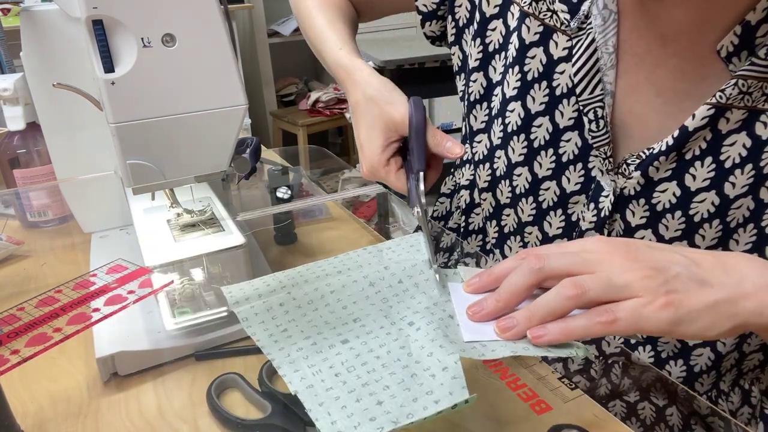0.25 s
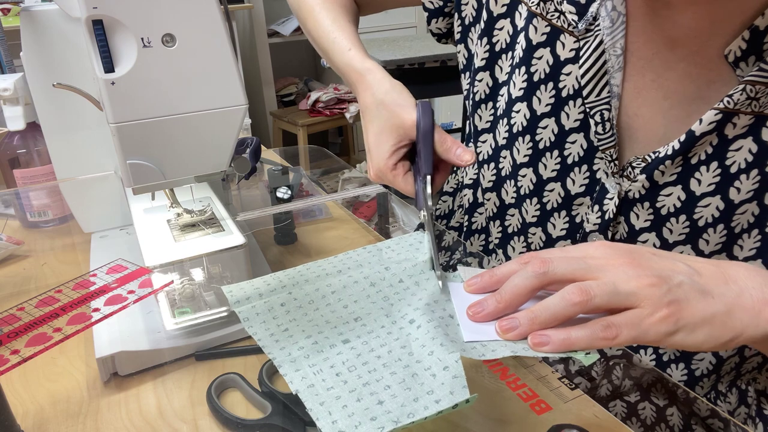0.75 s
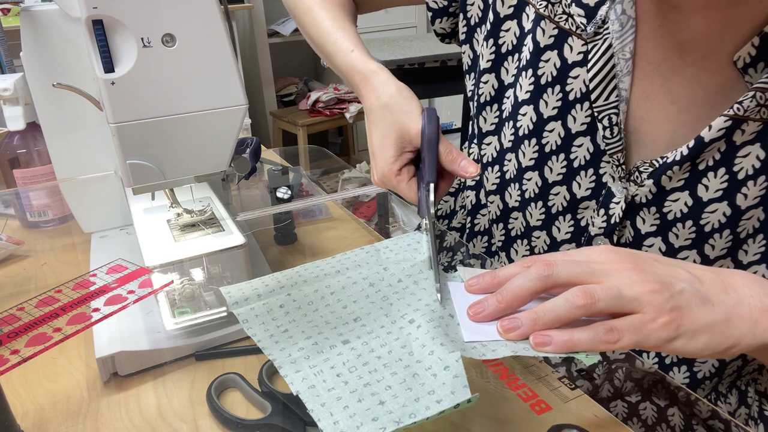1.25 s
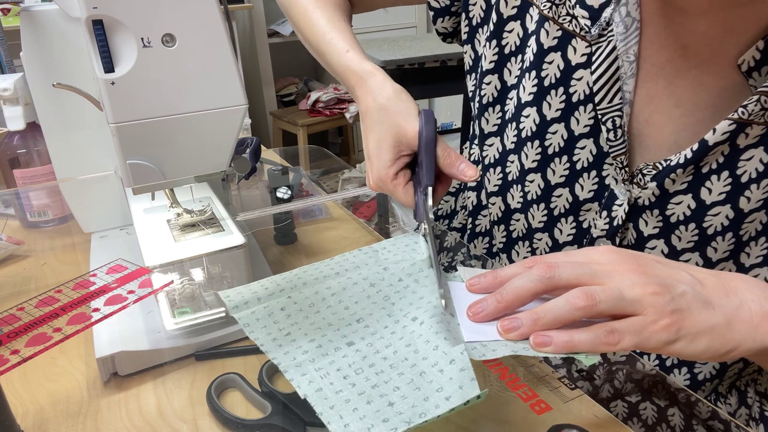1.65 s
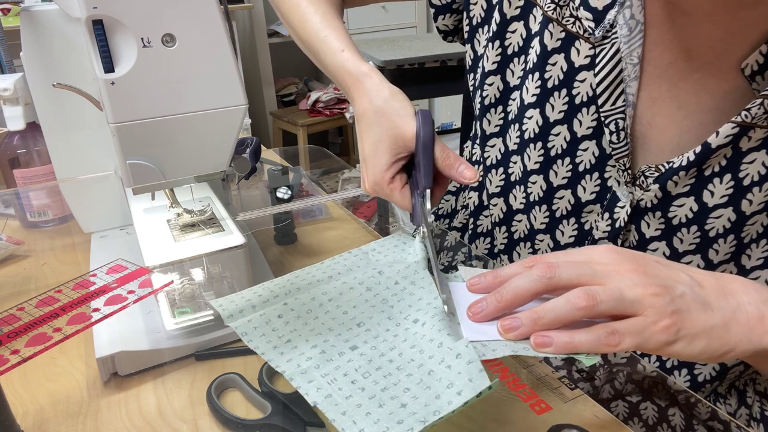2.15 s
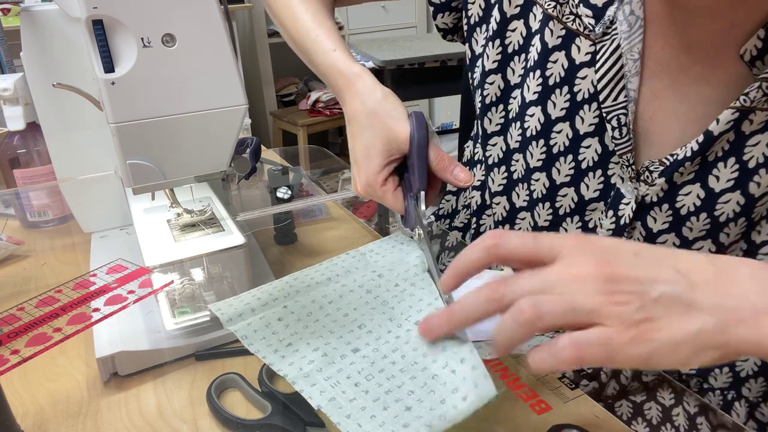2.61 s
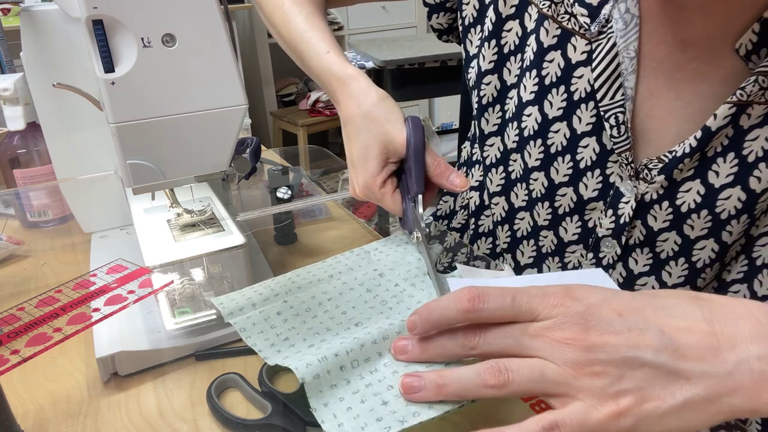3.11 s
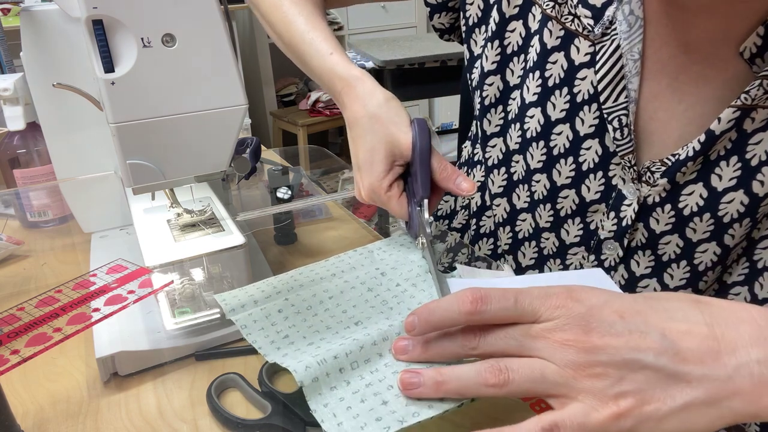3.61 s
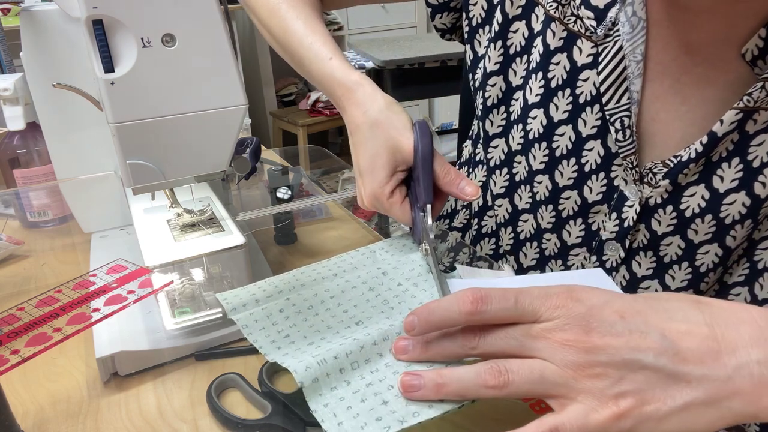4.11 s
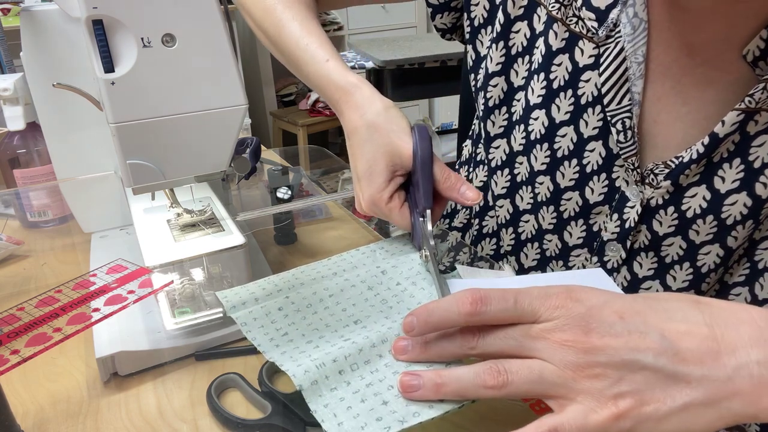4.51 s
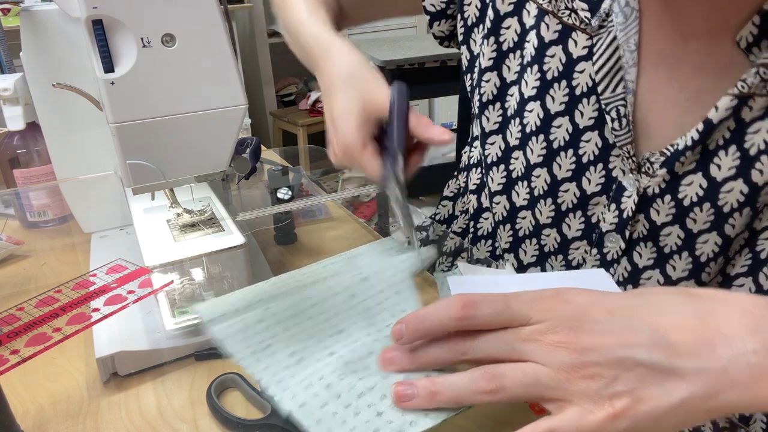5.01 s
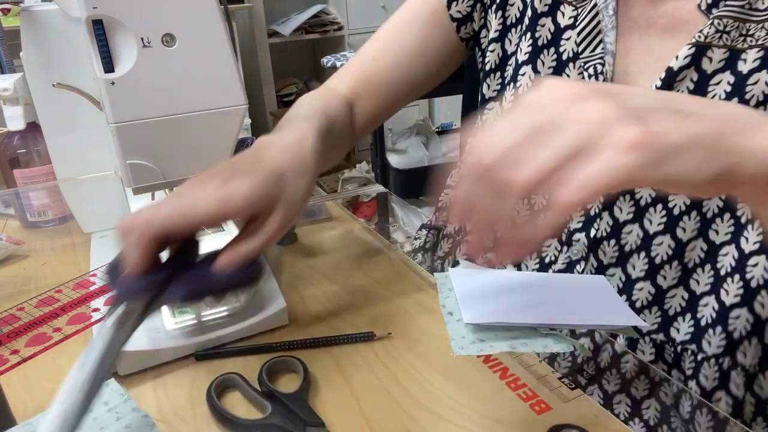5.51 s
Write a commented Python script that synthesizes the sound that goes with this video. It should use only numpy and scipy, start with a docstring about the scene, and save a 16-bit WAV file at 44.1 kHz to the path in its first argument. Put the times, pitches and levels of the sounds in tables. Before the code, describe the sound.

In a small quiet room, dressmaking scissors cut cotton close to a stereo microphone. Three gritty, metallic snips come at an easy pace, the blades rubbing softly open between them. Cloth rustles during a pause, then five shorter snips quicken, with handles knocking near the end. The cloth slides away and the scissors land on wood with a loud clack.

```python
"""Dressmaking scissors cut cotton on a wooden table in a small, quiet room: three snips, a pause, five quicker ones.
Each snip is a dense run of noise bursts, one per snapping thread, ringing through blade and table filters.
Rough filtered noise makes the blades rub as they reopen and the cloth slide; gliding sines groan softly between.
Blurred decaying modes knock the handles together after some snips and set the scissors down with a clack.
A steady hush lies under it all."""
import sys
import numpy as np
from scipy import signal
from scipy.fft import rfft, irfft, next_fast_len
from scipy.io import wavfile
from scipy.ndimage import map_coordinates

SR = 44100
rng = np.random.default_rng(int(sys.argv[2]) if len(sys.argv) > 2 else 0)


def materialize(psi):
    """Save the field psi as 16-bit PCM at rate SR to the path in sys.argv[1].

    A 1-D psi becomes a single channel; in a 2-D psi each row is a channel.
    """
    bounded = np.clip(np.atleast_2d(psi).T, -1, 1)
    quanta = np.round(bounded * 32767).astype(np.int16)
    wavfile.write(sys.argv[1], SR, quanta)


N = 253610


def amp(db):
    """Decibels to gain."""
    return 10 ** (np.asarray(db) / 20)


def unit(x):
    """Scale to rms 1."""
    return x / np.sqrt(np.mean(x ** 2) + 1e-20)


def along(points, hz):
    """Read (f/Hz, value) points on a log frequency axis."""
    f, v = np.transpose(points)
    return np.interp(np.log(hz + 1), np.log(f + 1), v)


def clock():
    """The time of every sample, in seconds."""
    return np.arange(N) / SR


def wobble(rate):
    """A smooth random curve through rate knots a second."""
    knots = rng.standard_normal(int(N * rate / SR) + 4)
    return map_coordinates(knots, [np.arange(N) * rate / SR])


def colour(x, spectrum, peaks=(), size=8192):
    """Causal minimum-phase filter of energy 1: a broad spectrum with resonances standing on it."""
    hz = np.fft.rfftfreq(size, 1 / SR)
    db = along(spectrum, hz)
    for centre, width, rise in peaks:
        db = db + rise / (1 + (2 * (hz - centre) / width) ** 2)
    cepstrum = irfft(np.log(amp(db)))
    kernel = irfft(np.exp(rfft(2 * cepstrum[:size // 2], size)))
    return signal.oaconvolve(x, kernel / np.linalg.norm(kernel))[:len(x)]


def stroke(t, start, end, edge):
    """A gate from start to end whose flanks last edge seconds."""
    rise = np.clip((t - start) / edge + .5, 0, 1)
    fall = np.clip((end - t) / edge + .5, 0, 1)
    return rise * fall


def add(track, s, sound):
    """Mix a sound in at time s."""
    part = track[round(s * SR):][:len(sound)]
    part += sound[:len(part)]


def burst(t60, size=16384):
    """Noise of energy 1 that falls 60 dB in t60 seconds."""
    x = rng.standard_normal(size) * amp(-60 * np.arange(size) / SR / t60)
    return x / np.linalg.norm(x)


def friction(rows, spectrum, edge, rough_db, rough_rate):
    """Uneven rubbing: noise of randomly wavering strength under a series of strokes."""
    t = clock()
    pressure = sum(amp(db) * stroke(t, start, end, edge) for start, end, db in rows)
    rough = unit(amp(rough_db * wobble(rough_rate)) * rng.standard_normal(N))
    return colour(pressure * rough, spectrum)


# the hush of the quiet room: (f/Hz, relative level/dB)
HUSH_SPECTRUM = [(15, -60), (25, -14), (64, -2.5), (113, -2), (144, -3), (246, -7), (322, -10),
                 (389, -11.5), (684, -12.5), (782, -12.5), (2060, -19), (2490, -18), (3000, -19),
                 (15500, -26.5)]


def air():
    """The steady hush: noise common to both sides, plus a weaker independent noise on each."""
    mid, left, right = (colour(rng.standard_normal(N), HUSH_SPECTRUM) for _ in range(3))
    return amp(-68.5) * mid + amp(-75.5) * np.array([left, right])


# how long the reverberation lasts: (f/Hz, t60/s)
ROOM_DECAY = [(100, 0.6), (500, 0.23), (2000, 0.31), (6000, 0.22), (8500, 0.15), (14000, 0.27)]


def room(x):
    """The walls answer after 4 ms; each frequency dies at its own speed."""
    hz, t, z = signal.stft(rng.standard_normal(SR // 2), SR, nperseg=256)
    decay = np.exp(-np.log(1000) * t / along(ROOM_DECAY, hz)[:, None])
    tail = signal.istft(z * decay, SR, nperseg=256)[1]
    return signal.fftconvolve(np.pad(x, (SR // 250, 0)), tail / np.linalg.norm(tail))[:N]


# level difference between the two listening points: (f/Hz, left minus right level/dB)
LEFT_RIGHT_DB = [(60, 0), (150, -0.5), (380, -5.5), (950, -2.0), (2380, -2), (5980, -1.5), (15000, 0)]
# phase difference between them: (f/Hz, phase by which left leads/rad)
LEFT_LEAD = [(0, 0.52), (5600, 0.32), (8610, 0.41), (9040, 0.11), (9820, 0.99), (10800, 0.059),
             (16200, 0.0)]


def place(x, wet_db, wide_db):
    """A source in the room heard at two close points: small level and phase offsets, faint side echoes."""
    mid, side = x + amp(wet_db) * room(x), amp(wide_db) * room(x)
    m = next_fast_len(N + SR // 2)
    hz = np.fft.rfftfreq(m, 1 / SR)
    half = amp(along(LEFT_RIGHT_DB, hz) / 2) * np.exp(.5j * along(LEFT_LEAD, hz))
    return irfft(rfft([mid + side, mid - side], m) * [half, 1 / half], m)[:, :N]


# faint low groans between strokes: (start t/s, end t/s, first f/Hz, last f/Hz, mid-glide level/dB)
GROAN_GLIDES = [(0.729, 0.872, 158, 139, -62), (1.808, 2.033, 122.5, 180, -62),
                (2.234, 2.559, 147.5, 56, -67), (3.19, 3.334, 125.3, 104, -62),
                (3.726, 3.993, 206.3, 174, -65.5), (4.879, 5.1, 104.8, 50, -62)]
GROAN_DB_PER_OCTAVE = 9  # a groan weakens as it sinks


def groans():
    """Soft low sines that glide in pitch and waver in pitch and level."""
    t, out = clock(), np.zeros(N)
    waver = 1 + 0.0735 * wobble(55)
    for start, end, first_hz, last_hz, db in GROAN_GLIDES:
        octaves = np.interp(t, [start, end], [-.5, .5]) * np.log2(last_hz / first_hz)
        pitch = np.sqrt(first_hz * last_hz) * 2 ** octaves * waver
        level = amp(db + GROAN_DB_PER_OCTAVE * octaves) * stroke(t, start, end, edge=0.061)
        out += level * np.sin(2 * np.pi * np.cumsum(pitch) / SR)
    return out * amp(0.63 * wobble(30))


# cloth slides under the hand: (start t/s, end t/s, hiss level/dB, dull table drag level/dB)
CLOTH_SLIDES = [(0.107, 0.344, -88, -69), (2.212, 2.31, -75, -64), (2.358, 2.445, -69, -68.5),
                (2.45, 2.572, -67.5, -83), (2.74, 2.814, -70.5, -82), (5.005, 5.234, -75.5, -86)]
# hiss of the sliding cloth: (f/Hz, relative level/dB)
CLOTH_SPECTRUM = [(200, -4), (1000, -12.5), (2500, -15), (5500, -2.5), (9000, -6.5), (15000, -10)]
# dull rubbing, of cloth on table and of reopening blades: (f/Hz, relative level/dB)
RUB_SPECTRUM = [(60, -23), (130, 5), (300, -9), (520, 5), (680, -3.5), (900, 1), (1200, -4.5),
                (1600, -10.5), (3500, -15.5), (4500, -21.5), (7500, -23), (10000, -34), (16000, -38)]


def cloth():
    """Sliding cloth hisses and drags dully on the table."""
    hiss_rows = [(start, end, db) for start, end, db, _ in CLOTH_SLIDES]
    drag_rows = [(start, end, db) for start, end, _, db in CLOTH_SLIDES]
    hiss = friction(hiss_rows, CLOTH_SPECTRUM, edge=0.043, rough_db=4.0, rough_rate=90)
    drag = friction(drag_rows, RUB_SPECTRUM, edge=0.02, rough_db=2.5, rough_rate=150)
    return hiss + drag


# push of a blunt contact: (f/Hz, relative level/dB)
BLOW_SPECTRUM = [(30, -42), (120, -22), (400, 13), (1400, 2), (2200, -3), (3700, -10), (5500, -31),
                 (16000, -41)]


def strike(modes, blow_db, scatter_db, blur, lowest_hz):
    """A blunt push, then modes blurred by the loose contact; small bodies radiate no bass."""
    t = np.arange(SR // 2) / SR
    ring = amp(blow_db) * colour(signal.unit_impulse(len(t)), BLOW_SPECTRUM)
    for hz, db, t60 in modes:
        drift = blur * np.cumsum(rng.standard_normal(len(t))) / np.sqrt(t60 * SR)
        decay = np.exp(-np.log(1000) * t / t60)
        ring += amp(db + scatter_db * rng.normal()) * decay * np.sin(2 * np.pi * hz * t + drift)
    return signal.sosfilt(signal.butter(2, lowest_hz, "high", fs=SR, output="sos"), ring)


# modes of the tabletop: (f/Hz, mean relative level/dB, t60/s)
TABLETOP_MODES = [(52.5, -22, 0.56), (86, -20, 0.62), (109, -15, 0.33), (140, -32, .25), (180, -18.5, 0.23),
                  (245, -13.5, 0.56), (280, -7, 0.12), (352, -15, 0.28), (485, -13, 0.22), (710, -20, 0.09),
                  (776, -12, 0.12), (910, -20, .15), (996, -21, 0.14), (1410, -4.5, 0.023),
                  (1920, -15, 0.034), (3570, -38, 0.11), (4370, -35, .07), (5600, -26, .15),
                  (5850, -32, 0.14)]
# blade on blade: (f/Hz, relative level/dB)
CLINK_SPECTRUM = [(500, -17), (3000, -17), (4500, -1.5), (5700, 1.5), (7300, -9.5), (9000, -16),
                  (12000, -11.5), (16000, -30)]
# loose things on the table: (f/Hz, relative level/dB)
CLATTER_SPECTRUM = [(200, -7), (450, -9), (720, 10.5), (1000, -5), (1500, -11), (2200, -11), (3000, -24),
                    (6000, -27), (12000, -45)]
# the whole table shudders: (f/Hz, relative level/dB)
THUD_SPECTRUM = [(30, -35), (55, -6), (110, 6), (160, -4.5), (260, -7.5), (450, -16), (1000, -30),
                 (3000, -55)]


def set_down():
    """The handles land on the tabletop, the blades clink together, then the weight of the hand settles."""
    out = np.zeros(N)
    tabletop = strike(TABLETOP_MODES, blow_db=14, scatter_db=1.0, blur=2.8, lowest_hz=50)
    add(out, 5.6754, -amp(-22.0) * tabletop)
    add(out, 5.676, amp(-4.5) * colour(burst(t60=0.013), BLOW_SPECTRUM))
    add(out, 5.678, amp(-7.5) * colour(burst(t60=0.16), CLATTER_SPECTRUM))
    add(out, 5.6783, amp(-9.0) * colour(burst(t60=0.0096), CLINK_SPECTRUM))
    add(out, 5.6825, amp(-34) * colour(burst(t60=0.026), CLINK_SPECTRUM))
    add(out, 5.684, amp(-3.5) * colour(burst(t60=0.32), THUD_SPECTRUM))
    add(out, 5.740, amp(-12) * colour(burst(t60=0.036), THUD_SPECTRUM))  # the hand settles
    return out


# light touches of the blades: (t/s, relative level/dB)
BLADE_TICKS = [(0.302, -48.5), (.322, -49), (2.483, -50), (2.698, -45.5), (3.279, -54), (5.434, -47.5)]
# tone of a light touch: (f/Hz, relative level/dB)
TICK_SPECTRUM = [(300, -20), (1500, 4), (3000, -4.5), (5500, 1), (7500, -7), (15000, -8)]
# the handles meet: (t/s, relative level/dB)
HANDLE_KNOCKS = [(1.236, -35), (3.609, -26), (4.469, -16.5), (4.7354, -12)]
# modes of the plastic handles: (f/Hz, mean relative level/dB, t60/s)
HANDLE_MODES = [(539, -6, 0.074), (645, -15, 0.082), (887, -10, 0.06), (1063, -3, 0.021), (1287, -13, .04),
                (1462, -19, 0.056), (1940, -37, 0.027)]


def contacts():
    """The blades tick; the plastic handles knock together and jolt the table."""
    out = np.zeros(N)
    for s, db in BLADE_TICKS:
        add(out, s, amp(db + 8.5) * colour(burst(t60=0.014), TICK_SPECTRUM))
    for s, db in HANDLE_KNOCKS:
        knock = strike(HANDLE_MODES, blow_db=-16, scatter_db=2.0, blur=2.4, lowest_hz=473)
        add(out, s, amp(db - 9.5) * knock)
        add(out, s + 0.01714, amp(db - 1.5) * colour(burst(t60=0.117), THUD_SPECTRUM))
    return out


USUAL_CUT_S = 0.067  # a stroke of middling speed
TURN_S, TURN_SHARE = .083, .45  # the hand turns round after a fixed pause plus a share of the cut's length
RUB_DB, RUB_DB_PER_DOUBLING = -59, 4  # a quicker reopening rubs louder
WHISPER_DB, WHISPER_STRETCH = -74.5, 1.73  # the bare edges whisper on, this many times as long as the rub


def reopenings():
    """After a cut the hand turns round: the blades rub open and their bare edges whisper over each other."""
    rubs, whispers = [], []
    for start, end, _, _, _, _, _, length, *_ in SNIP_STROKES:
        if length > .01:
            turn = end + TURN_S + TURN_SHARE * (end - start)
            rub_db = RUB_DB + RUB_DB_PER_DOUBLING * np.log2(USUAL_CUT_S / length)
            rubs.append((turn, turn + length, rub_db))
            whispers.append((turn, turn + WHISPER_STRETCH * length, WHISPER_DB))
    rub = friction(rubs, RUB_SPECTRUM, edge=0.038, rough_db=2.5, rough_rate=150)
    whisper = friction(whispers, EDGE_SPECTRUM, edge=0.1, rough_db=4.0, rough_rate=52)
    return rub + whisper


def threads(t, rate, life, spread_db, scrape):
    """Threads part at uneven intervals, each a tiny burst of fibres, over the scrape of the edges."""
    unevenness = rng.exponential(1, len(t)) * np.exp(.5 * wobble(rate)[:len(t)])
    passed = np.cumsum(rate / SR * unevenness)
    snaps = np.diff(np.floor(passed), prepend=0) * amp(spread_db * rng.standard_normal(len(t)))
    fibres = signal.lfilter([1], [1, -np.exp(-1 / (life * SR))], snaps)
    return unit((unit(fibres) + scrape) * rng.standard_normal(len(t)))


def travelling(x, closing, spectrum, peaks, shift, scatter_db):
    """The crossing point runs from pivot to tips, so the sound crossfades between two sets of resonances."""
    out = 0
    for share in (.5 - closing, .5 + closing):
        moved = [(hz * (1 + shift * rng.normal()), width, db + scatter_db * rng.normal())
                 for hz, width, db in peaks]
        out = out + colour(x * share, spectrum, moved)
    return out


TOUCH_S, TOUCH_DB = 0.0064, -19  # the edges meet the cloth just before they grip; dB against the cut
GRIP_S = 0.013  # the first threads catch
STALL_DB = -6  # the blades slow near the tips
LAST_S, LAST_DB = .012, -1.5  # the last threads part together


def squeeze(t, closing, start, end, swell_db, grip_s, grip_db, last_s):
    """The force of one stroke: touch, grip, the run through the cloth, a stall, and the last threads."""
    arch_db = -3.5 * (2 * closing) ** 2  # the hand squeezes hardest in mid-stroke
    force = amp(1.0 + swell_db * closing + arch_db) * stroke(t, start, end, edge=0.0019)
    grip, shut = start - grip_s, end + last_s
    stages = [(grip - TOUCH_S, start, TOUCH_DB),
              (grip, grip + GRIP_S, grip_db),
              (end, shut, STALL_DB),
              (shut - LAST_S, shut, LAST_DB)]
    for first, last, db in stages:
        force = np.maximum(force, amp(db) * stroke(t, first, last, edge=0.0037))
    return force


# one stroke each: (start t/s, end t/s, relative level/dB, swell/dB, grip ahead of the start/s,
# grip level against the cut/dB, last catch after the end/s, reopening length/s (0 = stays shut),
# high blade ring f/Hz, low blade ring f/Hz, low ring rise/dB, relative thump level/dB)
SNIP_STROKES = [(0.444, 0.582, -40, 6, .035, -8, 0.027, 0.09, 8070, 3800, 2.5, -12.5),
                (1.114, 1.226, -40, 3.5, 0.017, -9, 0.019, 0.12, 7400, 2640, 1, -12.5),
                (1.646, 1.727, -39.5, 5, 0.0073, -18, .020, 0.095, 7200, 5600, 5.3, -9.5),
                (3.047, 3.121, -39.5, 3.5, 0.019, -17.5, 0.032, 0.088, 7530, 5700, 5, -6),
                (3.533, 3.597, -38, 2, 0.013, -15.5, 0.022, 0.073, 7350, 5700, 6.8, -12),
                (4.001, 4.055, -37.5, 0, 0.0097, -10, .022, 0.054, 7150, 5600, 4.2, -10.5),
                (4.402, 4.457, -38, -3.5, .007, -13, 0.0091, 0.059, 8200, 5600, 3.2, -12),
                (4.702, 4.733, -41, 8, 0.00094, -20, 0, 0, 8300, 5440, 1.5, -11)]
# bright bite of the blade edges, also their whisper: (f/Hz, relative level/dB)
EDGE_SPECTRUM = [(800, -24.5), (2200, -12), (2500, -4), (3100, -5.5), (4000, -6), (4600, -3.5), (5300, 2.5),
                 (6600, -0.5), (8300, 0), (9000, -8), (10500, -14.5), (12000, -23), (16000, -49)]
# blade resonances before random scatter: (f/Hz, width/Hz, rise/dB)
STEEL_PEAKS = [(2430, 176, 12), (2677, 266, 10.5), (3470, 880, 10.5), (5400, 360, 0), (5840, 190, 5),
               (6330, 99, 2.5), (7060, 600, 8.5), (8290, 210, 5)]
# broad tone of the driven table: (f/Hz, relative level/dB)
BODY_SPECTRUM = [(60, -40.5), (250, -4), (330, -17.5), (430, -2.5), (1000, -5.5), (1500, -6), (2100, -8.5),
                 (3000, -12.5), (4300, -14), (6000, -20.5), (10000, -45), (16000, -35)]
# the table under the lower blade, before random scatter: (f/Hz, width/Hz, rise/dB)
TABLE_PEAKS = [(531, 61, 12.5), (707, 34, 5.5), (859, 80, 11), (1111, 150, 10), (1390, 200, 2),
               (1748, 310, 5.5), (2071, 66, 12)]
# airy top of the cut: (f/Hz, relative level/dB)
FIZZ_SPECTRUM = [(4000, -22), (9000, 1), (10500, 5), (12500, 9), (15000, 10.5), (16500, 19)]
# low answer of the heavy tabletop: (f/Hz, relative level/dB)
THUMP_SPECTRUM = [(30, -27), (65, -10.5), (95, -1), (130, 7), (165, -5), (220, -13), (500, -32)]
FIZZ_DB, FIZZ_DB_PER_DOUBLING = -14, 4.5  # faster strokes fizz more
TABLE_DB, TABLE_DB_PER_DOUBLING = -3.5, 1.9  # and shake the table more


def snips():
    """Each run of threads drives the blades and the table; fizz and thump grow as the cut nears the tips."""
    out = np.zeros(N)
    for (start, end, db, swell_db, grip_s, grip_db, last_s, _,
         high_hz, low_hz, low_db, thump_db) in SNIP_STROKES:
        t = start - .1 + np.arange(SR // 2) / SR
        closing = np.clip((t - start) / (end - start), 0, 1) - .5  # -.5 open to .5 shut
        speed = np.log2(USUAL_CUT_S / (end - start))  # in doublings
        force = amp(db) * squeeze(t, closing, start, end, swell_db, grip_s, grip_db, last_s)
        cut = force * threads(t, rate=600, life=0.0011, spread_db=2.0, scrape=1.0)
        bite = (force / force.max()) ** 0.25  # light catches are duller than the full cut
        rings = STEEL_PEAKS + [(high_hz, 900, 6), (low_hz, 700, low_db)]
        blades = travelling(cut * bite, closing, EDGE_SPECTRUM, rings, shift=0.013, scatter_db=1.5)
        table = travelling(cut * amp(2 * closing), closing, BODY_SPECTRUM, TABLE_PEAKS,
                           shift=0.022, scatter_db=1.4)
        table *= amp(TABLE_DB + TABLE_DB_PER_DOUBLING * speed)
        fizz = colour(cut * bite * amp(10 * closing), FIZZ_SPECTRUM)
        fizz *= amp(FIZZ_DB + FIZZ_DB_PER_DOUBLING * speed)
        thump = amp(thump_db - 3.0) * colour(cut * amp(4.7 * closing), THUMP_SPECTRUM)
        add(out, t[0], blades + table + fizz)
        add(out, t[0] + .008, thump)  # the heavy tabletop answers late
    return out


def scene():
    """Scissors and cloth just right of centre, over the room's hush."""
    work = snips() + reopenings() + contacts() + cloth() + groans()
    placed_work = place(work, wet_db=-9.5, wide_db=-20.5)
    placed_clack = place(set_down(), wet_db=-10.5, wide_db=-18.0)
    return placed_work + placed_clack + air()


TOP_HZ = 15780  # band limit


def record(dry):
    """Nothing is kept above the band limit."""
    m = next_fast_len(N + SR // 2)
    kept = np.fft.rfftfreq(m, 1 / SR) < TOP_HZ
    return irfft(rfft(dry, m) * kept, m)[..., :N]


dry = scene()
out = record(dry)
materialize(out)
```